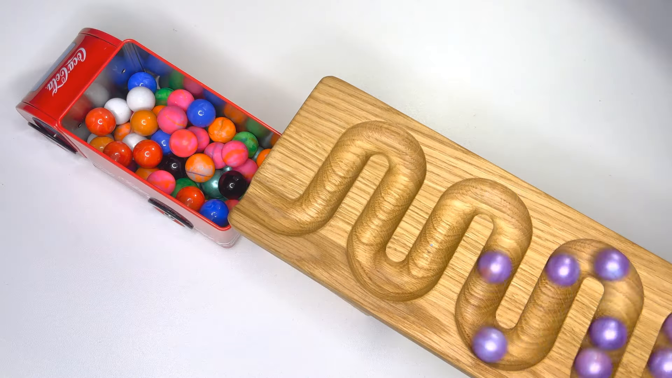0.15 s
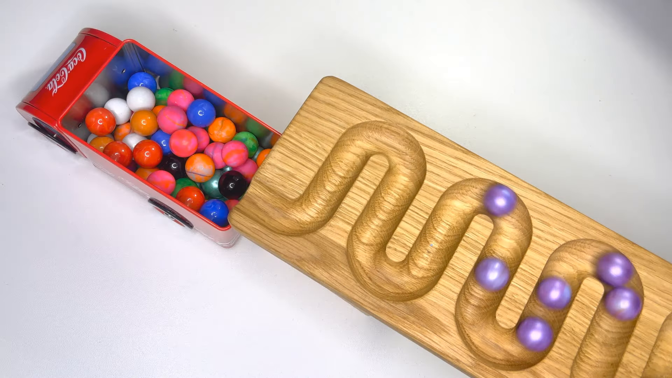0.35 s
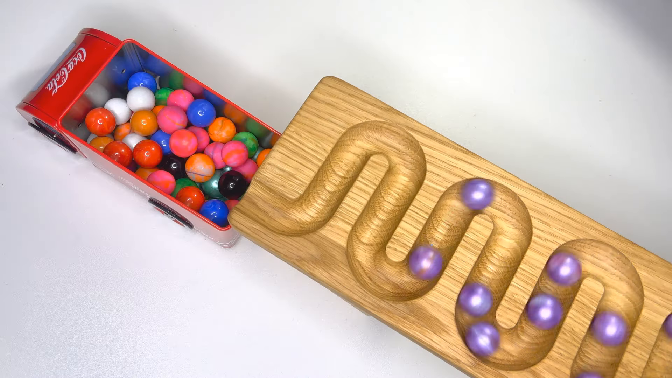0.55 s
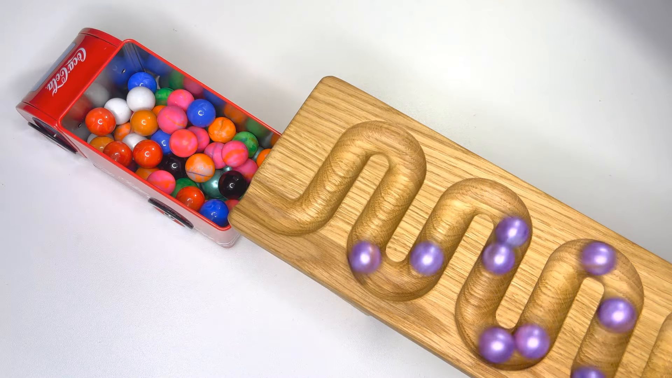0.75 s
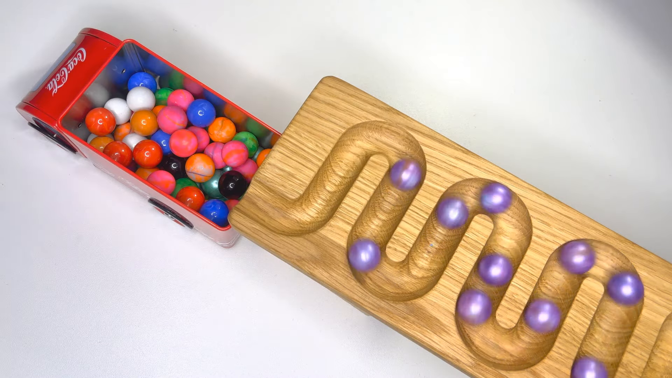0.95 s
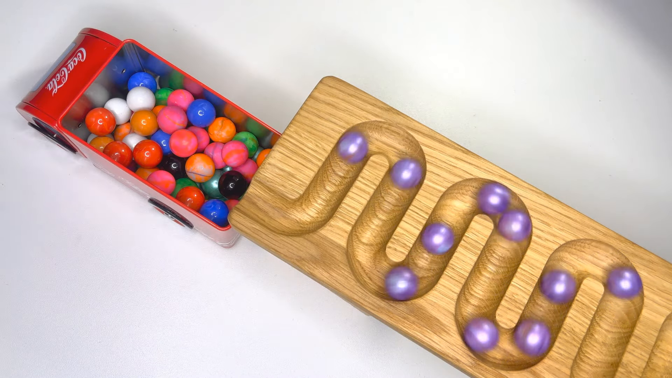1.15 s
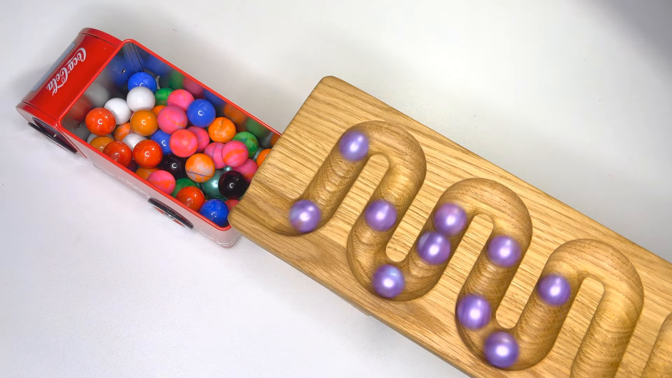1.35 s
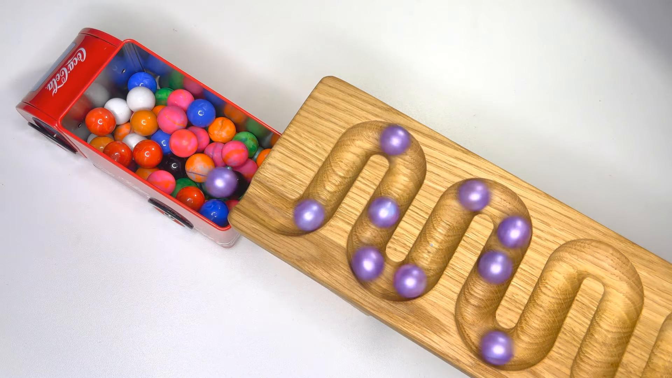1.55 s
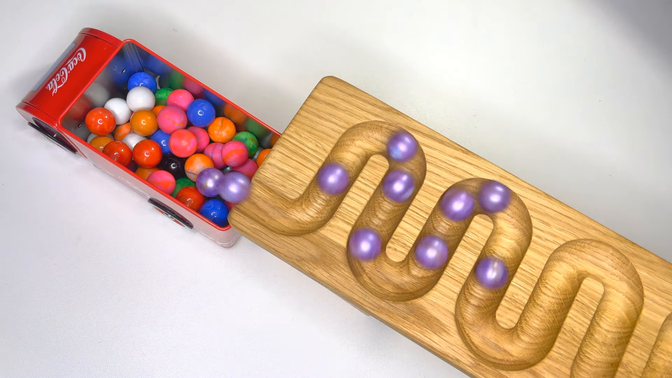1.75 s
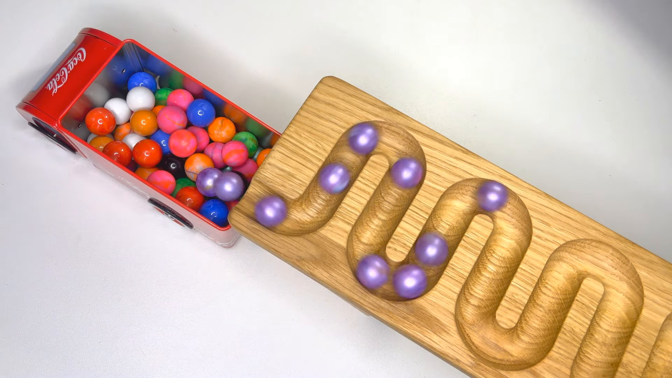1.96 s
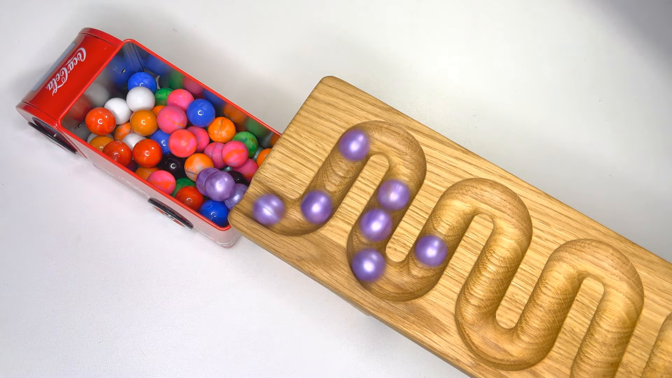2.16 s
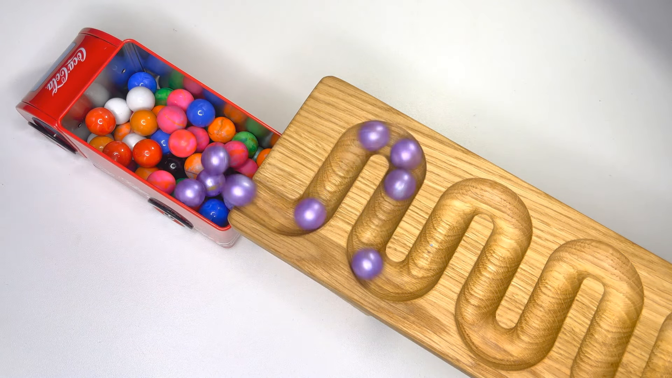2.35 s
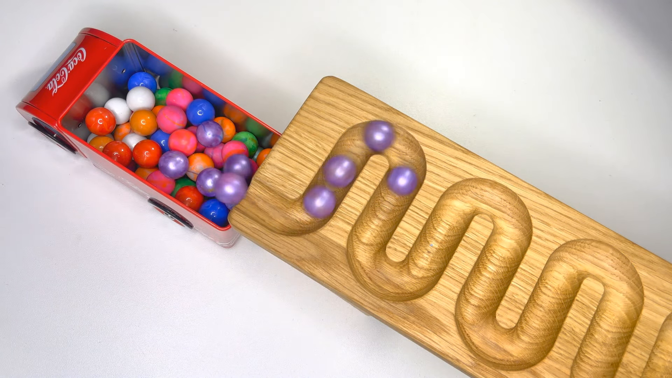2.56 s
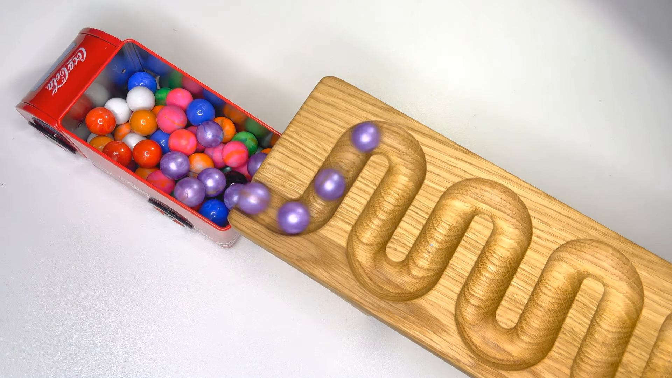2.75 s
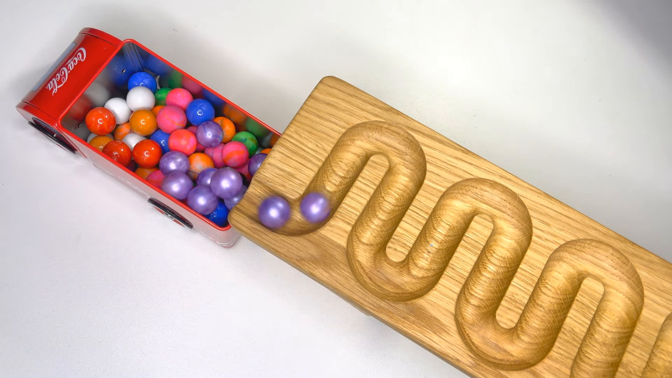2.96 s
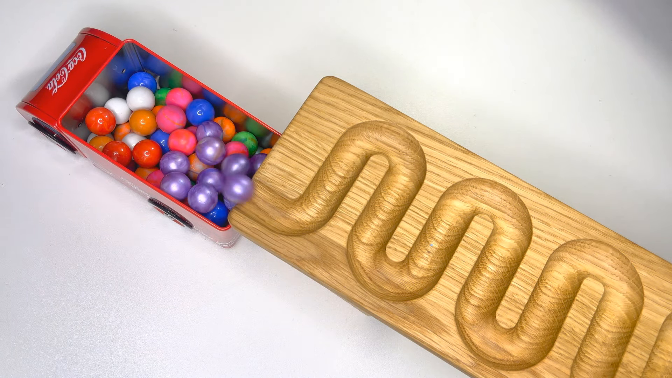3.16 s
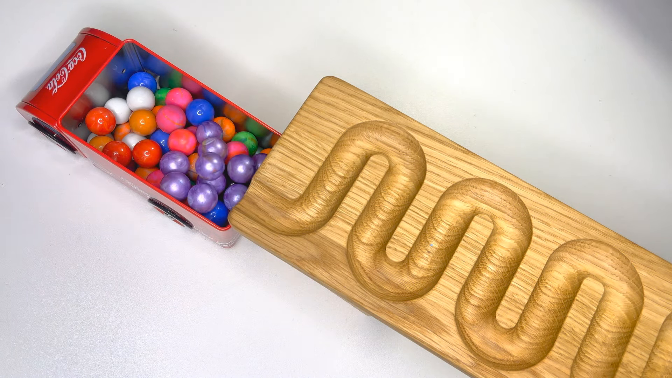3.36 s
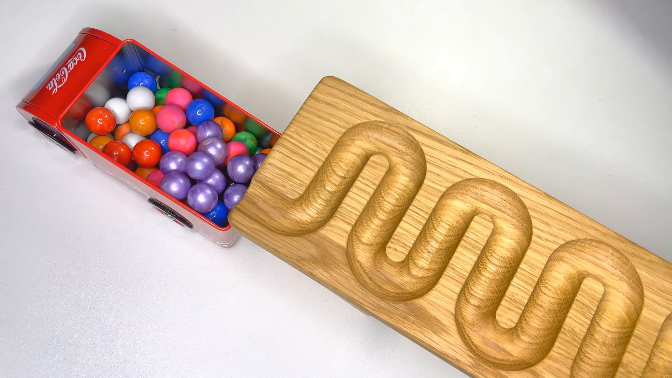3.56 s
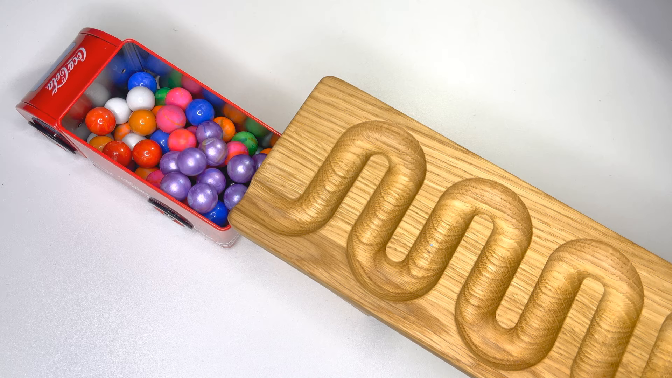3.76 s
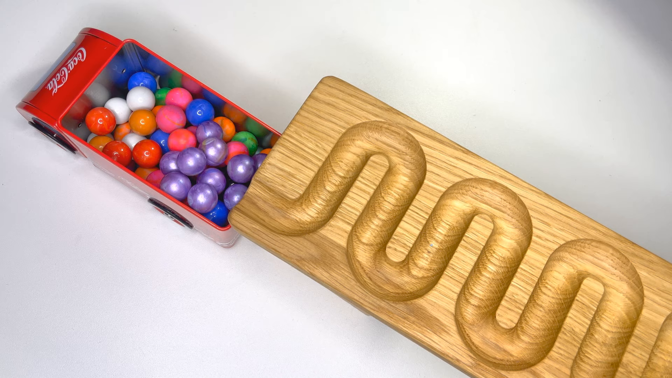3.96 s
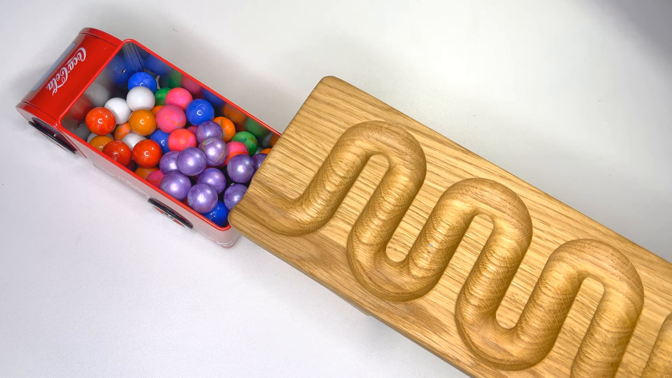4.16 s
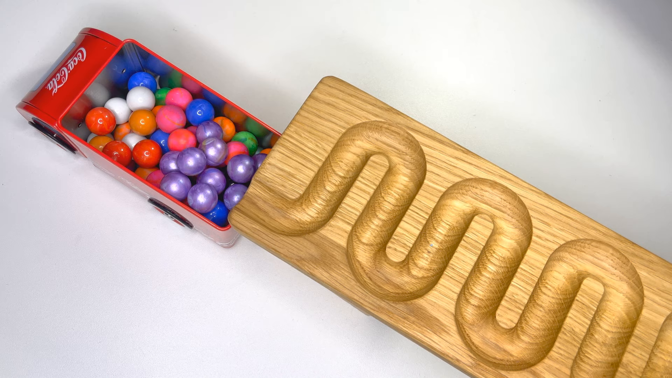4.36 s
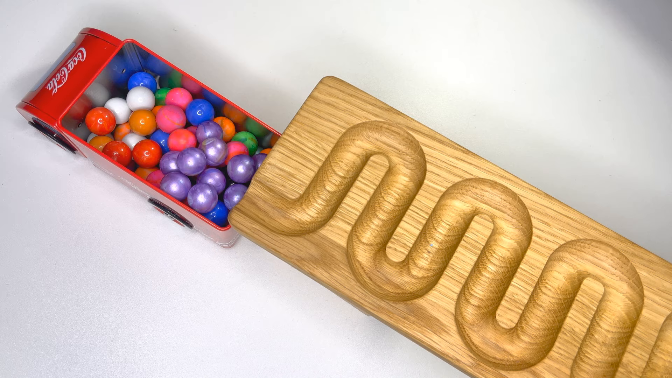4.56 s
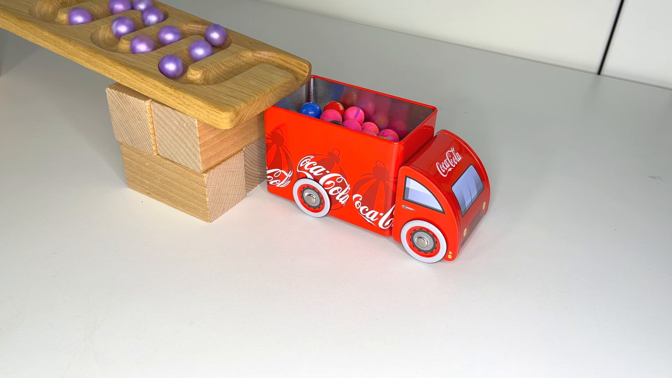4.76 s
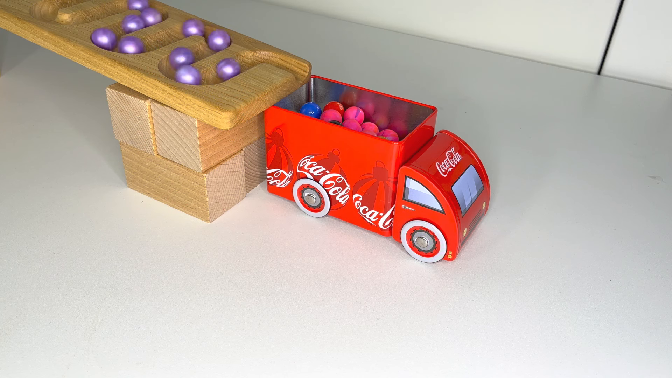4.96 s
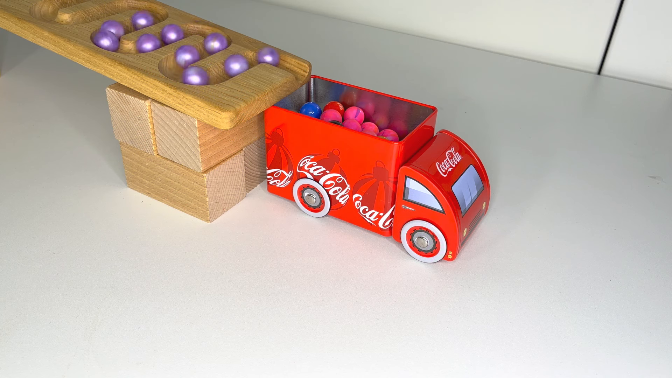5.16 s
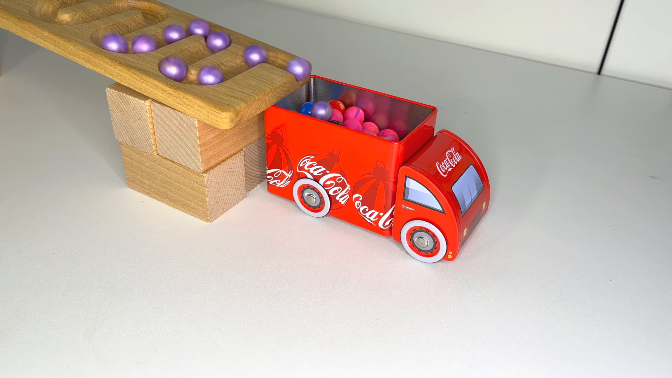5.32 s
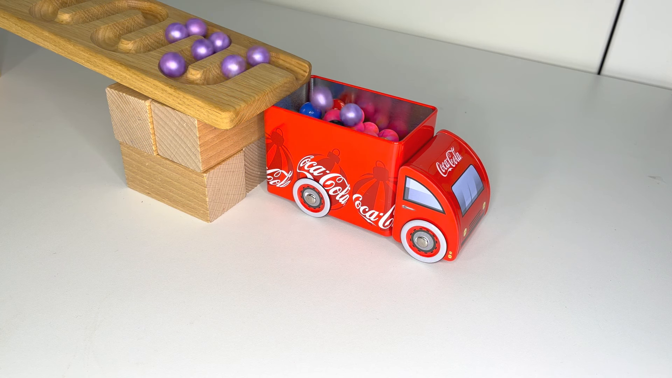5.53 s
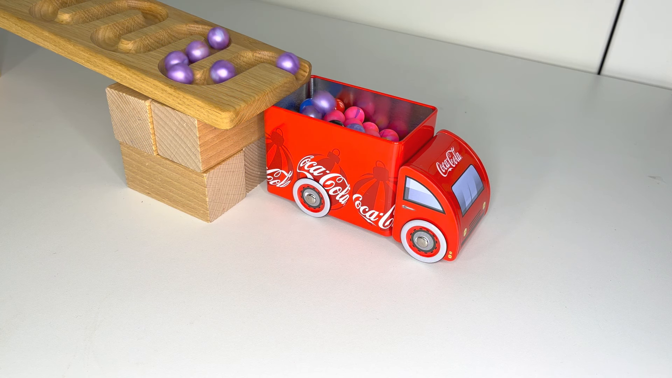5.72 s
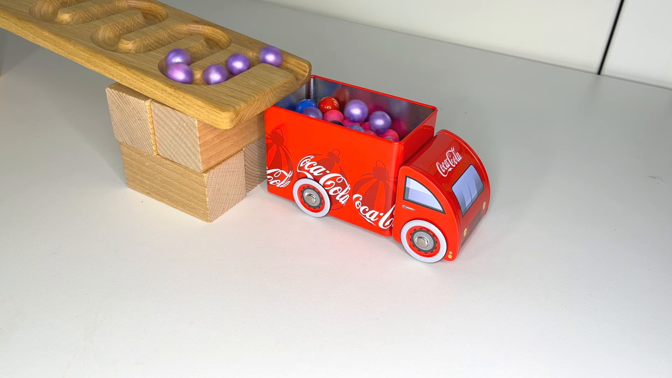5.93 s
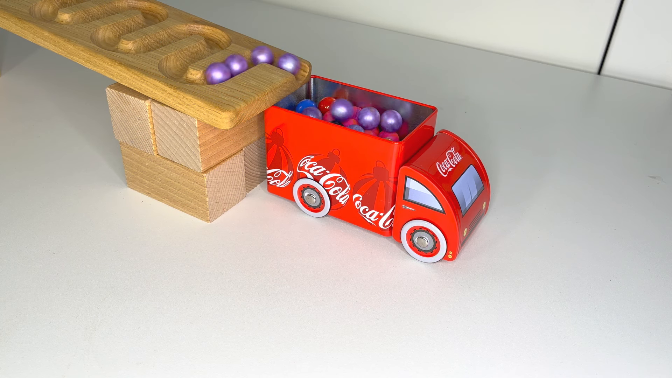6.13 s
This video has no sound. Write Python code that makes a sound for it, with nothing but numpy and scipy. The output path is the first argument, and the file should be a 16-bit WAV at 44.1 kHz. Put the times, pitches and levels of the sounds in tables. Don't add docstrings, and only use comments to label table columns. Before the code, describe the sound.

Dense wooden rolling gives way to sharp glassy clacks in a tin box of marbles, a near-silent pause, then a second, duller roll and clatter.

```python
import sys
import numpy as np
from scipy import signal
from scipy.fft import rfft, irfft
from scipy.io import wavfile
from scipy.ndimage import uniform_filter1d, map_coordinates

SR = 44100
rng = np.random.default_rng(int(sys.argv[2]) if len(sys.argv) > 2 else 0)


def wav_record(signal):
    frames = np.transpose(np.atleast_2d(signal))
    bounded = np.clip(frames, -1, 1)
    quanta = np.round(bounded * 32767).astype(np.int16)
    wavfile.write(sys.argv[1], SR, quanta)


def gain_from_decibels(decibels):
    exponent = np.asarray(decibels, float) / 20
    return 10 ** exponent


N = 272979

# its start in seconds, its end in seconds.
CUT = (4.6675, 4.6762)
TOP_HZ = 15830
# time in seconds, level in dB.
ROLL_TOP = [(0.008, -39), (0.02, -33.5), (0.25, -34), (0.53, -35.5), (0.62, -35), (1.266, -35), (1.29, -39),
            (1.336, -32.5), (1.36, -35.5), (1.7, -35.5), (2.278, -39), (2.5, -38), (2.82, -45.5),
            (3.07, -56.5), (3.3, -56.5)]
# time in seconds, level in dB.
ROLL_SIDE = [(4.69, -44), (4.95, -40), (5.11, -42), (5.27, -43), (5.35, -41), (5.78, -44), (5.93, -44.5),
             (6.04, -52.5), (6.19, -45)]
# start in seconds, click peak in dB, tin in dB, heap in dB, rattle t60 in seconds.
LANDINGS_TOP = [(1.6117, -21.5, 3, -5.5, 0.057), (1.806, -23, 1.5, -9, 0.059),
                (2.006, -27.5, 7.5, -2.5, 0.028), (2.1076, -22, 3.5, -11, 0.052),
                (2.2818, -30.5, 4.5, -5.5, 0.035), (2.3229, -24, 2, -6, 0.033),
                (2.4179, -29.5, 1.5, -1.5, 0.025), (2.551, -32, 2, 1, 0.015), (2.6211, -22, 2, -5.5, 0.032),
                (2.859, -21, 4.5, -7.5, 0.029), (2.964, -27.5, 3.5, -5, 0.031),
                (3.054, -28.5, 6.5, 2, 0.01), (3.143, -24.5, 5.5, -9, 0.025),
                (3.1853, -27.5, -1.5, -5, 0.043), (3.2324, -26, 1, -4, 0.031)]
# start in seconds, click peak in dB, tin in dB, heap in dB, rattle t60 in seconds.
LANDINGS_SIDE = [
    (5.2898, -27, 6.1, -2, 0.018),
    (5.4143, -25.5, 3.3, -2, 0.019),
    (5.478, -30.5, 2.6, -5.5, 0.036),
    (5.555, -28, 1.6, -3, 0.032),
    (5.675, -34, 0.89, -2.5, 0.033),
    (5.7443, -27.5, 1.3, -12, 0.03),
    (5.8481, -33.5, 5.9, -2, 0.029),
    (5.953, -36, 6.6, -2, 0.059),
    (6.1091, -27, 2.3, -4, 0.029),
]


def along(points, hz):
    f, v = np.transpose(points)
    return np.interp(np.log(hz + 1), np.log(f + 1), v)


def unit(x):
    return x / np.sqrt(np.mean(x ** 2) + 1e-20)


def curve(rows, column):
    rows = np.asarray(rows)
    return np.interp(np.arange(N) / SR, rows[:, 0], rows[:, column])


def wobble(rate):
    return map_coordinates(rng.standard_normal(N // 100), [np.arange(N) * rate / SR])


def peaks(modes, hz):
    return sum((gain_from_decibels(db) * hz * w) ** 2 / ((c * c - hz * hz) ** 2 + (hz * w) ** 2) for c, w, db in modes)


def coloured(x, gain):
    m = 8192
    cepstrum = irfft(np.log(gain(np.fft.rfftfreq(m, 1 / SR)) + 1e-6))
    cepstrum[1:m // 2] *= 2
    cepstrum[m // 2 + 1:] = 0
    response = irfft(np.exp(rfft(cepstrum)))
    response = response * np.hanning(2 * m)[m:] ** 0.5
    return signal.fftconvolve(x, response / np.linalg.norm(response))[:N]


def bursts(times, level_db, t60, spiky):
    out, t = np.zeros(N + SR), np.arange(4096) / SR
    noise = rng.standard_normal((len(times), 2, len(t)))
    shape = gain_from_decibels(-60 * t / np.clip(t60, 0.001, 0.2)[:, None])
    rows = shape * noise[:, 0] * np.exp(spiky * noise[:, 1])
    gain = gain_from_decibels(level_db) * np.linalg.norm(shape, axis=1) / np.linalg.norm(rows, axis=1)
    rows *= gain[:, None]
    for s, row in zip(times, rows):
        out[round(s * SR):][:len(t)] += row
    return out[:N]


def rings(events, t60_s, gain_db, above, rise_s):
    out, t = np.zeros(N + SR), np.arange(SR // 2) / SR
    for s, db, hz in events:
        tone = np.sin(2 * np.pi * hz * t) + 0.24 * np.sin(2 * np.pi * above * hz * t)
        swell = 1 - np.exp(-t / rise_s)
        out[round(s * SR):][:len(t)] += gain_from_decibels(db + gain_db - 60 * t / t60_s) * tone * swell
    return out[:N]


def background():
    # frequency in Hz, level in dB.
    thrum_colour = [(5, -6.5), (15, -7), (33, -4), (60, -5), (90, -20.5), (200, -16.5), (400, -47),
                    (4000, -100)]
    # frequency in Hz, level in dB per Hz.
    air_colour = [(50, -25), (100, 3), (200, -4.5), (500, -8.5), (1200, -15), (3000, -21), (9000, -24.5),
                  (15500, -26), (15900, -55.5)]
    # frequency in Hz, rms level in dB.
    whine_tones = [(6568, -87), (13136, -85)]
    roll_db, fall_db, rest_db, side_db = -22, -30.5, -81, -15
    fall_t60_s, air_db, whine_side_db = 2.2, -77, -8

    t = np.arange(N) / SR
    side = t > CUT[0]
    rolled = gain_from_decibels(np.where(side, curve(ROLL_SIDE, 1), curve(ROLL_TOP, 1)) + roll_db) ** 2
    shaken = 0
    for s, db, *_ in LANDINGS_TOP + LANDINGS_SIDE:
        heard = (t > s) * (side == (s > CUT[0]))
        shaken = shaken + heard * gain_from_decibels(db + fall_db - 60 * np.abs(t - s) / fall_t60_s) ** 2
    level = np.sqrt((rolled + shaken) * gain_from_decibels(side_db * side) ** 2 + gain_from_decibels(rest_db) ** 2)
    thrum = level * unit(coloured(rng.standard_normal(N), lambda hz: gain_from_decibels(along(thrum_colour, hz))))
    air = gain_from_decibels(air_db) * unit(coloured(rng.standard_normal(N), lambda hz: gain_from_decibels(along(air_colour, hz))))
    whine = sum(np.sqrt(2) * gain_from_decibels(db) * np.sin(2 * np.pi * hz * t) for hz, db in whine_tones)
    return thrum + air + whine * gain_from_decibels(whine_side_db * (t > CUT[1]))


def diffuse(x, from_hz):
    t60_s, halving_hz = 0.37, 11000
    late_slower, late_db = 2.8, -6.5
    hz, t, z = signal.stft(np.array([x, rng.standard_normal(N)]), SR, nperseg=128, noverlap=96)
    power = uniform_filter1d(np.abs(z[0]) ** 2, size=5, axis=0)
    keep = gain_from_decibels(-120 * t[1] / t60_s * (1 + (hz / halving_hz) ** 2))

    def fade(keeps):
        return np.array([signal.lfilter([1 - k], [1, -k], row) for k, row in zip(keeps, power)])

    tail = fade(keep) + gain_from_decibels(2 * late_db) * fade(keep ** (1 / late_slower))
    high = (hz ** 6 / (hz ** 6 + from_hz ** 6) * (hz < 16200))[:, None]
    noise = z[1] / np.sqrt(np.mean(np.abs(z[1]) ** 2))
    wet = signal.istft(noise * np.sqrt(np.abs(tail)) * high, SR, nperseg=128, noverlap=96)[1]
    wet = np.pad(wet, (200, 0))[:N]
    return irfft(rfft(wet) * (np.fft.rfftfreq(N, 1 / SR) < TOP_HZ), N)


def room(x):
    t60_s, halving_hz = 0.57, 14000
    diffuse_hz, diffuse_db = 4900, 0.5
    out, step = np.zeros(N + 2 * SR), SR // 8
    for start in range(-step, N, step):
        hz, t, z = signal.stft(rng.standard_normal(SR // 2), SR, nperseg=256)
        decay = gain_from_decibels(-60 * t / t60_s * (1 + (hz / halving_hz) ** 2)[:, None])
        tail = signal.istft(z * decay, SR, nperseg=256)[1]
        piece = np.pad(x, (step, 2 * step))[start + step:][:2 * step] * np.hanning(2 * step)
        wet = signal.fftconvolve(piece, tail / np.linalg.norm(tail))
        out[start + step:][:len(wet)] += wet
    low = irfft(rfft(out) / (1 + (np.fft.rfftfreq(len(out), 1 / SR) / diffuse_hz) ** 6), len(out))
    first_walls = low[step - 150:][:N]
    return first_walls + gain_from_decibels(diffuse_db) * diffuse(x, diffuse_hz)


def sway():
    sway_hz = 34
    rocking = []
    for s, db, *_ in LANDINGS_TOP:
        rocking.append((s, db - 5.1 * (s - 1.6), sway_hz * (1 + 0.2 * (s - 1.6))))
    return rings(rocking, t60_s=0.45, gain_db=-10.5, above=2.1, rise_s=0.05)


def settling():
    # start in seconds, click peak in dB, tin in dB, heap in dB, rattle t60 in seconds.
    slip_events = [
        (3.5447, -42, 8.5, -0.5, 0.037),
        (3.6126, -47, 3, -7, 0.014),
        (3.689, -72.5, 23, 14, 0.02),
        (3.7842, -75.5, 20.5, 4, 0.028),
        (3.8118, -94, 30, 10, 0.039),
        (3.8395, -82.5, 18, -5.5, 0.035),
        (3.375, -69, 10, 8.5, 0.02),
        (3.391, -69, 17.5, 4, 0.023),
    ]
    # start in seconds, level in dB, modes as Hz, width in Hz, dB.
    last_tick = (4.3655, -47, [(5050, 90, 7.5), (7860, 850, -8), (11500, 3200, -48), (2790, 900, -24),
                 (1700, 420, -12), (796, 460, -18)])
    last_s, last_db, last_modes = last_tick

    def soft(edge_hz):
        return lambda hz: 1 / (1 + (hz / edge_hz) ** 4)

    slips = coloured(drops(slip_events[:2]), soft(11900)) + coloured(drops(slip_events[2:]), soft(7440))
    tick = bursts([last_s], np.array([last_db]), np.array([0.014]), spiky=0.18)
    return gain_from_decibels(-4.0) * slips + coloured(tick, lambda hz: np.sqrt(peaks(last_modes, hz)))


def ticks():
    # start in seconds, peak in dB.
    touches = [(0.088, -46), (0.099, -44), (0.2708, -55), (0.2855, -50), (0.331, -37.5), (0.6584, -54),
               (0.6734, -61), (0.791, -49), (1.241, -50.5), (1.4449, -43), (1.4621, -57), (2.068, -44),
               (2.7571, -40), (4.668, -32.5), (5.1043, -35.5)]
    # frequency in Hz, level in dB.
    glass_colour = [(3000, -60), (5500, -7.5), (7000, 7), (9000, -7.5), (12000, -15.5), (16000, -35)]
    s, db = np.transpose(touches)
    return coloured(bursts(s, db - 3, 0.0086 + 0 * s, spiky=0.37), lambda hz: gain_from_decibels(along(glass_colour, hz)))


def board_gain(wood, modes):
    return lambda hz: gain_from_decibels(along(wood, hz)) * np.sqrt(1 + peaks(modes, hz))


def rolling(rows, start, wood, modes, lumps_db, fizz_db):
    usual_db, usual_rumble_db = -36, -3
    rumble_stays = 0.61
    t, force_db = np.arange(N) / SR, curve(rows, 1)

    def hard(hz):
        return hz ** 4 / (hz ** 4 + 1400 ** 4)

    def hard_gain(hz):
        fizz = 1 + gain_from_decibels(fizz_db) * np.exp(-((hz - 7800) / 2300) ** 4)
        return np.sqrt(hard(hz)) * fizz

    pushes = rng.standard_normal(N) * gain_from_decibels(19 * rng.random(N) ** 40)
    pushes = unit(pushes) * gain_from_decibels(lumps_db * wobble(90) + 1.2 * wobble(22))
    upper = coloured(unit(pushes), hard_gain)
    weight = rng.standard_normal(N) * gain_from_decibels(1.3 * wobble(44))
    rumble_db = usual_rumble_db + rumble_stays * (usual_db - force_db)
    lower = gain_from_decibels(rumble_db - 11.0 - fizz_db) * coloured(weight, lambda hz: np.sqrt(1 - hard(hz)))
    return (t >= start) * gain_from_decibels(force_db + 4.5) * unit(coloured(upper + lower, board_gain(wood, modes)))


def knocks(events, wood, modes):
    s, db, hard_db = np.transpose(events)
    colour = board_gain(wood, modes)

    def upper(hz):
        return hz ** 8 / (hz ** 8 + 3100 ** 8)

    body = bursts(s, db - 4.5, 0.021 + 0 * s, spiky=0.1)
    edge = bursts(s, db + hard_db + 0.5, 0.033 + 0 * s, spiky=0.14)
    return (coloured(body, lambda hz: colour(hz) ** 1.31 * (1 - upper(hz)) * hz ** 1.1)
            + coloured(edge, lambda hz: colour(hz) * upper(hz)))


def groove():
    # frequency in Hz, level in dB per Hz.
    wood_top = [(53, -50.5), (90, -17.5), (122, -12.5), (278, -10), (353, -10.5), (467, -10.5), (876, -4.5),
                (1540, -14), (2000, -9.5), (2480, -20.5), (2830, -33.5), (3910, -30), (5530, -51.5),
                (12500, -92), (16000, -112) ]
    wood_side = [(53, -26), (90, -14), (125, -5), (260, -8.5), (376, -5), (448, -15), (593, -14),
                 (1070, -8), (2090, -6.5), (2270, -19.5), (2890, -8), (3220, -18), (4400, -27.5),
                 (5500, -53.5), (16000, -74)]
    # frequency in Hz, width in Hz, level in dB.
    board_top = [(348.3, 32, 6.5), (1600, 33, -9), (2019, 120, 12), (2854, 56, 25.5), (3760, 280, 7.5),
                 (4230, 200, 3), (5060, 130, 11.5), (6310, 170, 11.5), (7730, 550, 12), (9400, 290, 21)]
    board_side = [(370, 5.6, 1.3), (565, 82, 13.1), (1290, 44, 9.2), (2150, 260, 9.6), (2936, 74, 6.5),
                  (3570, 160, 9.4), (3950, 130, 10.3), (4960, 145, 17), (6400, 330, 11.7), (8565, 950, 5.8)]
    # start in
    # seconds, peak in dB, hard upper part in dB.
    knocks_top = [(0.0382, -21, -17.5), (0.0874, -18.5, -5.5), (0.2708, -17.5, -5.5), (0.2844, -20.5, -8),
                  (0.3124, -21, -27), (0.3676, -34, -33), (0.3995, -26, -12), (0.4349, -15, -26),
                  (0.4454, -17, -23.5), (0.4936, -14, -25.5), (0.6025, -17, -16.5), (0.6434, -18.5, -21),
                  (0.6604, -31, -4.5), (0.6738, -25.5, -6), (0.7158, -19, -22), (0.7638, -17, -25),
                  (0.8625, -19.5, -17.5), (0.9232, -25, -14.5), (0.9584, -28.5, -11), (0.9864, -16.5, -23),
                  (1.0136, -21.5, -15.5), (1.0974, -21, -19.5), (1.181, -18, -22), (1.2396, -18, -19),
                  (1.3924, -20.5, -19.5), (1.4461, -16, -10), (1.4626, -16.5, -10.5), (1.4935, -21, -14),
                  (1.5474, -16, -19), (1.5648, -23, -14.5),
                  (0.069, -36, -22), (0.113, -25, -15), (0.294, -22.5, -23), (0.339, -33, -24.5),
                      (0.609, -20, -24), (0.6833, -26, -14.5), (0.7498, -30, -17), (0.7875, -22.5, -27),
                      (0.822, -27, -20), (0.9692, -26, -25), (0.9793, -24, -17), (1.031, -19, -19.5),
                      (1.0826, -20, -23), (1.1424, -22, -21.5), (1.16, -33, -20), (1.2274, -29, -26),
                      (1.2692, -25.5, -21.5), (1.3306, -22, -19.5), (1.431, -22.5, -21), (1.4836, -23, -17),
                      (1.7588, -28.5, -14.5), (1.883, -21.5, -17.5), (2.5213, -25, -13),
                      (2.566, -32.5, -16.5), (2.851, -30, -16), (2.881, -31.5, -17), (2.906, -37.5, -21),
                      (2.922, -32, -22), (2.941, -41, -19),
                  (1.705, -30.5, -7),
        (1.7429, -21.5, -10),
        (1.783, -32, -8),
        (1.8726, -24, -10.5),
        (1.954, -27.5, -10.5),
        (1.969, -29, -7.5),
        (2.068, -15, -7.5),
        (2.169, -28.5, -6),
        (2.183, -28.5, -13.5),
        (2.7572, -29.5, -7.5),
    ]
    knocks_side = [(4.6876, -24, -18), (4.7084, -31.5, -7.5), (4.729, -29, -19), (4.822, -33, -10.5),
                   (4.9488, -28, -10), (5.0688, -30, -19), (5.096, -23, -10), (5.16, -29, -16),
                   (5.187, -30, -28), (5.2008, -26, -9), (5.603, -20, -25), (5.6945, -21.5, -18),
                   (4.7474, -24.5, -24), (4.8633, -28.5, -9.5), (4.9307, -29, -5.5), (4.9844, -41, -8),
                   (5.0234, -23, -9), (5.0305, -33, 3.5), (5.0414, -19.5, -21), (5.0863, -18, -25),
                   (5.1374, -34, -6), (5.2547, -23.5, -8), (5.3374, -19.5, -22), (5.9409, -32, -5)]

    fading = np.clip((3.3 - np.arange(N) / SR) / 0.1, 0, 1)
    top = fading * rolling(ROLL_TOP, 0, wood_top, board_top, lumps_db=2.5, fizz_db=3.0)
    side = rolling(ROLL_SIDE, CUT[0], wood_side, board_side, lumps_db=2.5, fizz_db=5.5)
    struck_top = knocks(knocks_top, wood_top, board_top)
    return top + side + struck_top + knocks(knocks_side, wood_side, board_side)


def drops(events, snap_db=0):
    # frequency in Hz, level in dB.
    snap_colour = [(2000, -41), (4500, -11.5), (7000, -2), (9500, 10.5), (12500, 8), (15500, 0.5),
                   (17000, -11.5)]
    # frequency in Hz, level in dB.
    click_colour = [(1500, -84.5), (4000, 5.5), (5800, 3.5), (7500, 3), (9000, 5), (11000, -6.5),
                    (13000, -5.5), (15750, -13.5), (16000, -54.5)]
    # frequency in Hz, width in Hz, level in dB.
    heap_modes = [(2816, 900, 4), (3150, 1300, 18), (3890, 130, 2), (5100, 170, 2.5)]
    tin_modes = [(650, 180, -7.5), (993, 230, 2.5), (1176, 27, 4.5), (1260, 70, -9.5), (1640, 270, -3),
                 (1820, 73, -4), (2043, 130, -1)]
    table_modes = [(36.3, 22, -0.5), (61.2, 25, -4.5), (166, 40, -4), (355, 54, 0.5)]
    # frequency in Hz, level in dB, t60 in seconds.
    wall_tones = [(715, -26.5, 0.13), (1120, -17, .2), (1695, -19.5, .15), (1810, -23, .1),
                  (2186, -30.5, 0.15), (2417, -27.5, .15), (2630, -27.5, .15), (3246, -27.5, .12),
                  (4075, -27, .15), (4468, -28, .06), (4950, -30, .1), (6643, -29.5, 0.04)]
    ring_db = -8.5

    s, db, tin_db, heap_db, t60 = np.transpose(events)
    push = gain_from_decibels(db + snap_db + 17.5) * rng.choice([-1, 1], len(s))
    snap = np.bincount(np.round(s * SR).astype(int), push, N)
    click = bursts(s, db + 3, t60, spiky=0.35)
    heap = bursts(s, db + heap_db + 4.0, 2.38 * t60, spiky=0.083)
    tin = bursts(s + 0.0003, db + tin_db, 1.75 * t60, spiky=0.64)
    tin += bursts(s + 0.0003, db + tin_db + 5.5, 0.0044 + 0 * s, spiky=0.067)
    thump = bursts(s, db + tin_db - 20 - 6 * (s > CUT[0]), 0.023 + 0 * s, spiky=0)
    blow = bursts(s + 0.0003, db + tin_db + ring_db + 9.5, 0.002 + 0 * s, spiky=0.19)
    walls = [(hz, 1.4 / np.clip(t60_s, 0.03, 0.25), level_db) for hz, level_db, t60_s in wall_tones]

    def low_cut(hz):
        return hz ** 4 / (hz ** 4 + 560 ** 4)

    return (coloured(snap, lambda hz: gain_from_decibels(along(snap_colour, hz)))
            + coloured(click, lambda hz: gain_from_decibels(along(click_colour, hz)))
            + coloured(heap, lambda hz: low_cut(hz) * peaks(heap_modes, hz) ** 0.61)
            + coloured(tin, lambda hz: low_cut(hz) * peaks(tin_modes, hz) ** 0.43)
            + coloured(blow, lambda hz: peaks(walls, hz) ** 0.5)
            + coloured(thump, lambda hz: peaks(table_modes, hz) ** 0.5))


def falls():
    # start in seconds, click peak in dB, tin in dB.
    rebounds_top = [(1.6201, -31.5, 7.5), (1.679, -46, 3), (1.633, -33, 6.5), (1.6666, -40, -1.5),
                    (1.9996, -30.5, 8.5), (2.017, -30, 4), (2.027, -33.5, 9), (2.251, -48, 11),
                    (2.2614, -42.5, 10), (2.353, -54, 0), (2.4327, -39, 4.5), (2.435, -27, 4),
                    (2.4508, -38.5, 11), (2.456, -31, 7), (2.468, -32.5, 9.5), (2.4703, -30.5, -3.5),
                    (2.4794, -29.5, -3.5), (2.583, -29, -1.5), (2.6548, -37.5, 11), (2.657, -25.5, 4.5),
                    (2.6774, -28.5, 2.5), (2.6872, -34, 0), (2.6929, -35.5, 2), (2.7783, -45.5, 6.5),
                    (2.9609, -39, 4.5), (2.9867, -33.5, 6), (2.9985, -30, 9.5), (3.0014, -39.5, 4.5),
                    (3.0825, -28.5, -4), (3.0986, -30.5, -1.5), (3.116, -33, 7.5), (3.1333, -38, -4),
                    (3.1951, -36.5, -3.5), (3.2128, -39, 8), (3.2397, -34, 0.5), (3.3248, -47, 1)]
    rebounds_side = [(5.322, -36.5, 6.5), (5.3671, -35.5, 6.5), (5.4647, -39.5, -19), (5.4849, -35, 10.5),
                     (5.49, -30.5, 2), (5.5048, -34, 5), (5.5695, -34, 10), (5.589, -28.5, -8),
                     (5.6152, -33, 1.5), (5.709, -49, -5), (5.7552, -31, 4.5), (5.762, -33, -3),
                     (5.808, -33.5, 1), (5.8579, -29.5, 5), (5.867, -29.5, 5), (5.891, -31.5, 1),
                     (5.9872, -37, 2.5), (6.006, -33.5, 3), (6.117, -28.5, 1.5), (6.129, -37, 10.5),
                     (6.151, -34.5, 5.5), (6.1734, -36, 5)]
    # start in seconds, peak in dB, pitch in Hz.
    clink_events = [(1.6119, -17, 9600), (1.8062, -19, 8460), (2.0111, -25.5, 9020), (2.0243, -26.5, 8730),
                    (2.1085, -22, 9600), (2.2896, -27, 6980), (2.3235, -24, 9060), (2.3549, -30, 7490),
                    (2.4355, -16, 8740), (2.4696, -22, 8520), (2.5517, -30, 9860), (2.5617, -33, 9050),
                    (2.5714, -50, 9000), (2.4805, -22.5, 9520), (2.6674, -26, 6380), (2.896, -35, 9400),
                    (3.0022, -24, 8470), (3.1332, -30, 8090), (3.2127, -19, 6290), (3.3246, -41, 6500),
                    (5.3029, -33, 7060), (5.4394, -36, 8900), (5.465, -28, 8960), (5.486, -20, 6000),
                    (5.5049, -22, 11670), (5.5562, -19.5, 8400), (5.7616, -22, 9900), (5.7971, -28, 6660),
                    (5.847, -20, 8530), (5.8583, -14, 8770), (5.8742, -20, 8100), (5.9513, -24, 8100),
                    (5.9735, -30, 8200), (6.118, -20, 9050), (6.1298, -20.5, 8700)]
    # start in seconds, peak in dB, pitch in Hz.
    panel_events = [(1.612, -3, 1810), (1.62, -12.5, 1910), (1.806, -7.5, 1176), (2.005, -17, 1210),
                    (2.108, -14, 1120), (2.323, -13, 1087), (2.418, -19, 930), (2.435, -11.5, 1140),
                    (2.454, -19, 1090), (2.621, -7.5, 1096), (2.657, -26, 1910), (2.676, -11, 1125),
                    (2.686, -22, 1120), (2.696, -18, 1104), (2.77, -23, 2036), (2.781, -23, 2060),
                    (2.838, -24, 2060), (2.859, -12, 1126), (2.963, -16.5, 1120), (3.0, -16, 1260),
                    (3.053, -25, 917), (3.144, -16, 1164), (3.185, -13.5, 1160), (3.213, -14, 1120),
                    (3.232, -20.5, 960), (3.546, -29, 1130), (3.547, -35, 1700), (3.69, -44, 2320),
                    (3.812, -47, 815), (5.29, -17, 2020), (5.416, -21, 1226), (5.485, -23, 1060),
                    (5.557, -13.5, 2090), (5.569, -23, 1063), (5.745, -16, 1006), (5.849, -13.5, 1977),
                    (5.857, -25, 1045), (5.866, -18, 1060), (5.891, -15, 2076), (5.954, -23, 1050),
                    (5.988, -22.5, 1850), (6.11, -12.5, 2116), (6.116, -22, 1036)]
    # start in seconds, peak in dB, pitch in Hz.
    clack_events = [(1.6108, -23, 3130), (1.8053, -17, 3630), (2.0033, -16, 3900), (2.1076, -20, 3620),
                    (2.3224, -20, 4300), (2.4349, -19, 4110), (2.582, -20.5, 3150), (2.6224, -12.5, 2780),
                    (2.6599, -18.5, 2830), (2.8596, -14, 4250), (2.9639, -21.5, 3800), (3.0007, -22, 3760),
                    (3.0553, -15.5, 2780), (3.0824, -20, 2780), (3.143, -18.5, 3240), (3.1877, -14, 2940),
                    (3.2334, -18.5, 3120), (3.6128, -37.5, 2970), (3.7858, -43, 2850), (5.2897, -24, 3330),
                    (5.4125, -19, 3160), (5.555, -24, 2930), (5.7457, -20, 3040), (5.85, -14.5, 2680),
                    (6.11, -19, 4180)]
    rebound_heap_db, rebound_t60_s = -3, 0.033

    rebounds = [(*row, rebound_heap_db, rebound_t60_s) for row in rebounds_top + rebounds_side]
    contacts = drops(LANDINGS_TOP + LANDINGS_SIDE)
    contacts = contacts + drops(rebounds, snap_db=-5)
    clinks = rings(clink_events, t60_s=0.0095, gain_db=0, above=0.48, rise_s=0.0001)
    panels = rings(panel_events, t60_s=0.05, gain_db=-8, above=1.7, rise_s=0.00026)
    clacks = rings(clack_events, t60_s=0.03, gain_db=-7, above=1.38, rise_s=0.0004)
    return contacts + clinks + panels + clacks


def scene():
    near = groove()
    clicks = falls() + settling() + ticks()
    reverb = room(gain_from_decibels(-13.5) * clicks + gain_from_decibels(-7.5) * near)
    return (near + clicks + reverb + background() + sway())[None]


def band_limit(x):
    return signal.sosfilt(signal.butter(12, 16990, fs=SR, output="sos"), x)


def record(dry):
    t = np.arange(N) / SR
    hz = np.fft.rfftfreq(N, 1 / SR)
    limited = irfft(rfft(dry) * gain_from_decibels(-0.045 * np.clip(hz - TOP_HZ, 0, 2000)), N)
    gap = np.clip(np.maximum(CUT[0] - t, t - CUT[1]) / 0.0012, 0, 1)
    opening = np.clip((t - 0.0085) / 0.002, 0, 1)
    return band_limit(limited * gap * opening)


dry = scene()
out = record(dry)
wav_record(out)
```